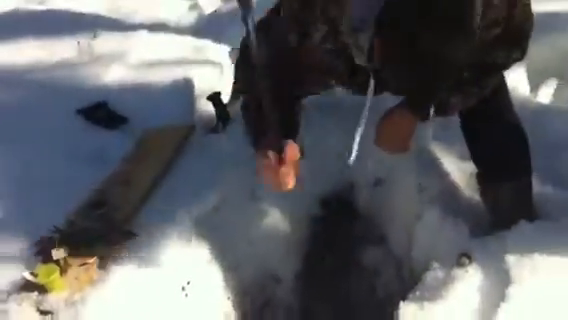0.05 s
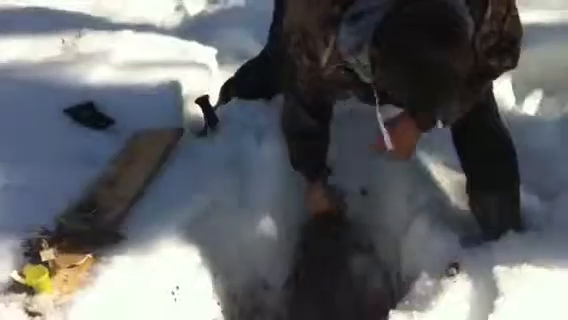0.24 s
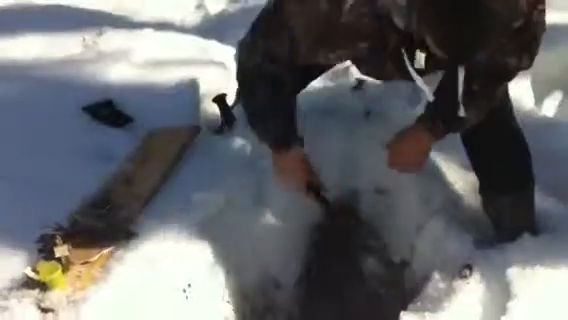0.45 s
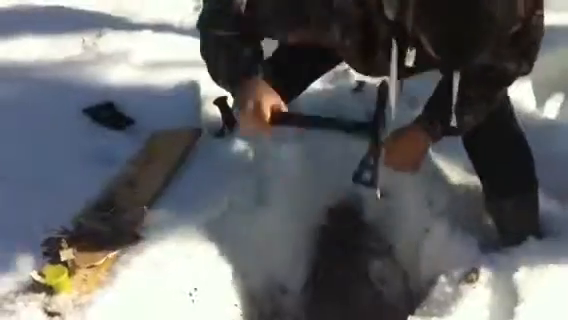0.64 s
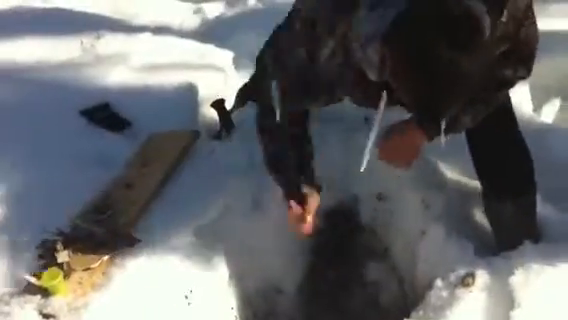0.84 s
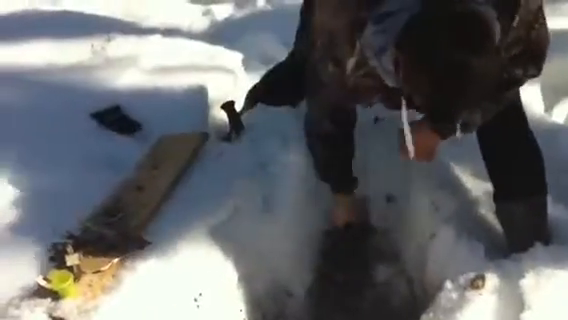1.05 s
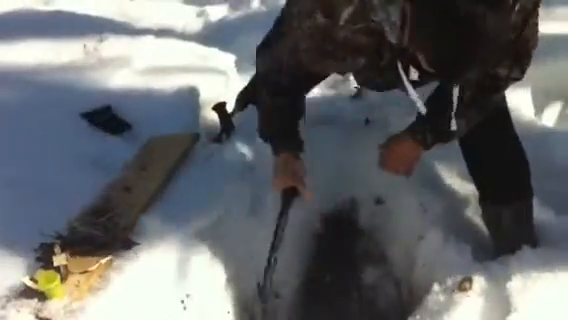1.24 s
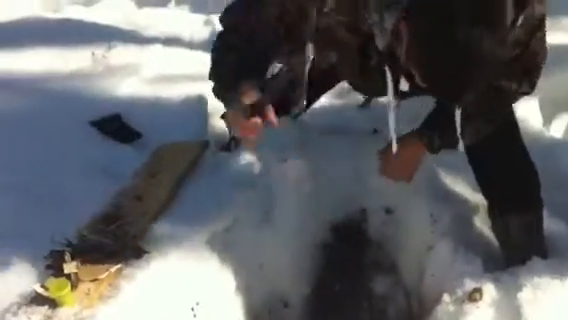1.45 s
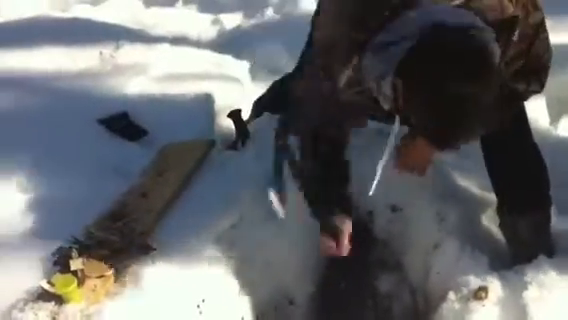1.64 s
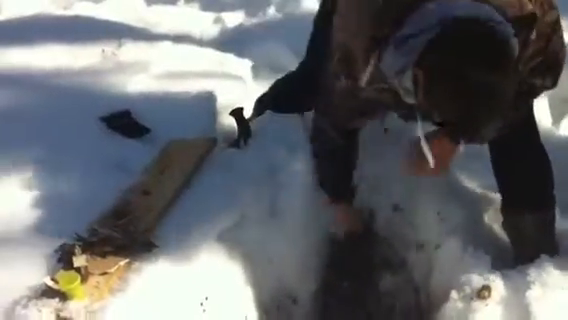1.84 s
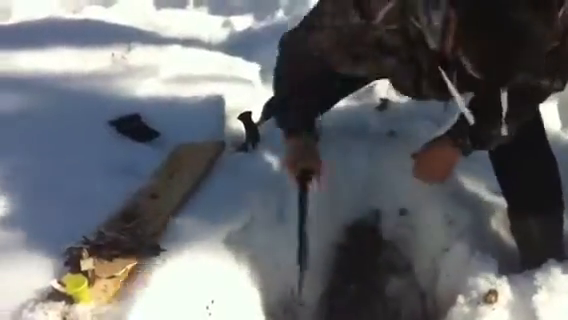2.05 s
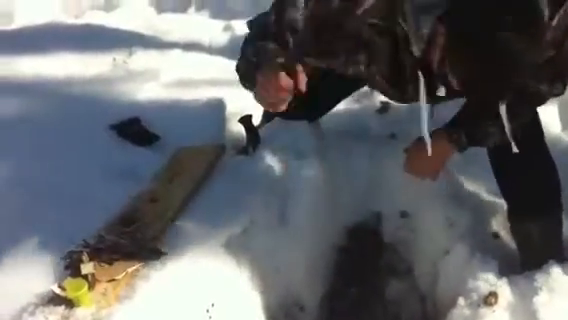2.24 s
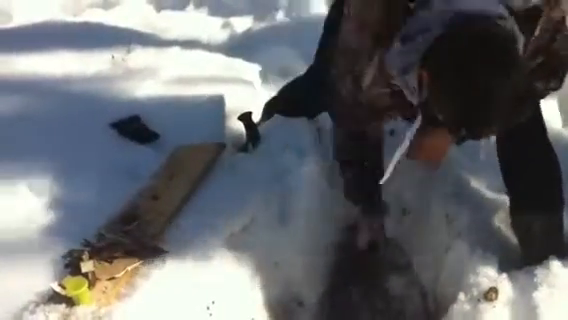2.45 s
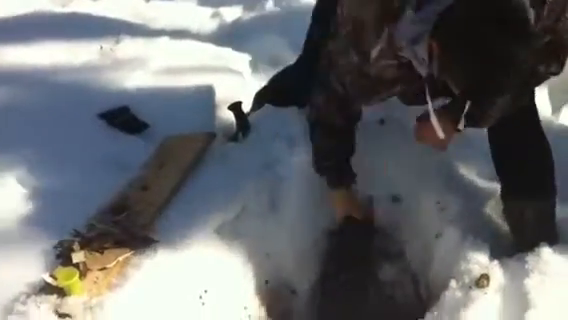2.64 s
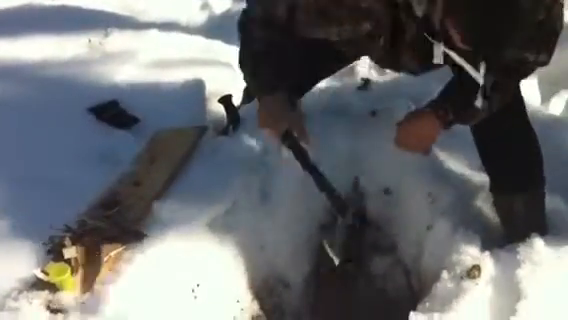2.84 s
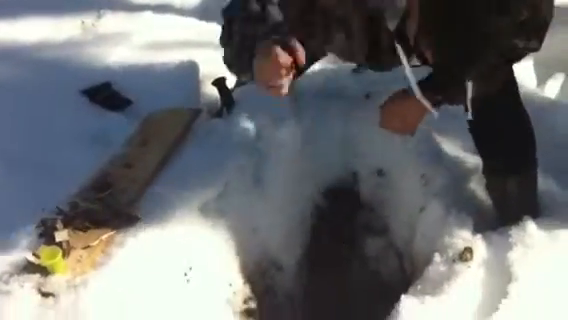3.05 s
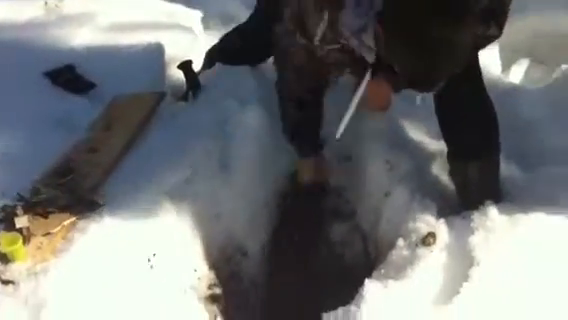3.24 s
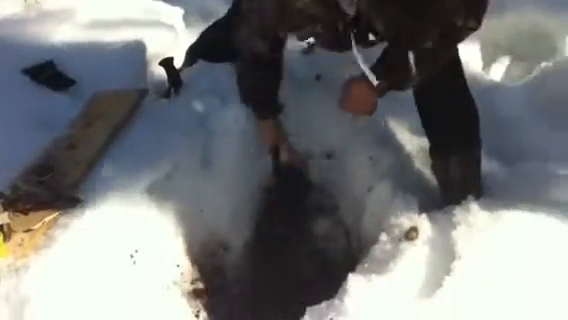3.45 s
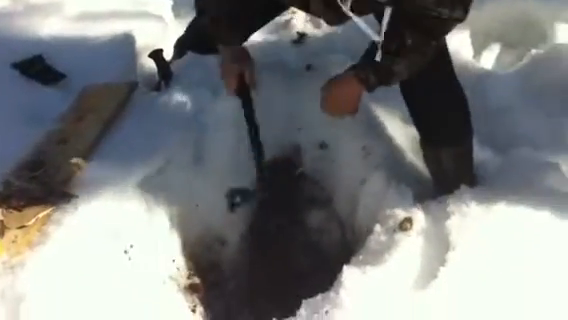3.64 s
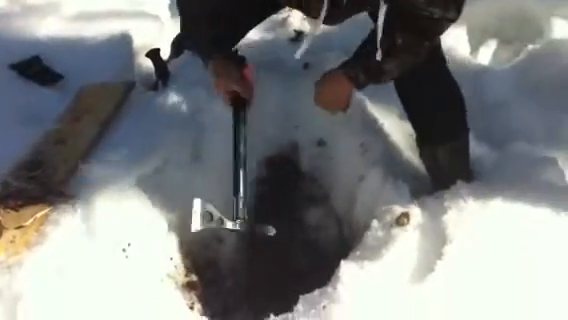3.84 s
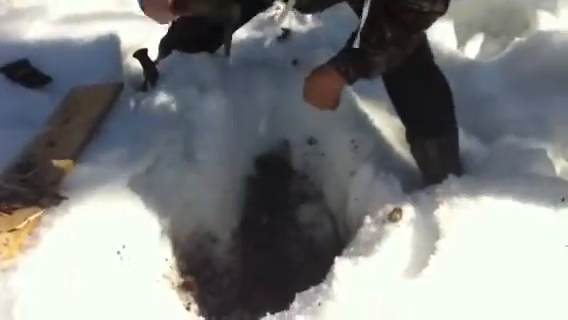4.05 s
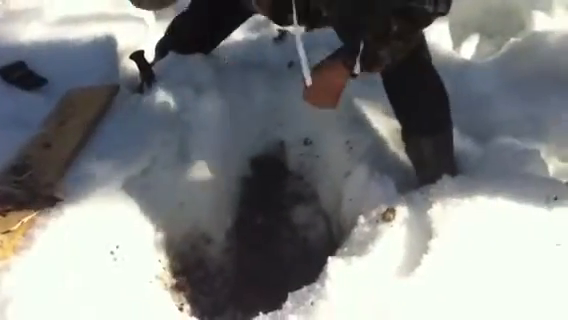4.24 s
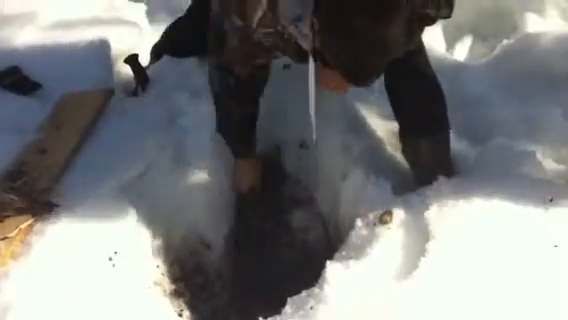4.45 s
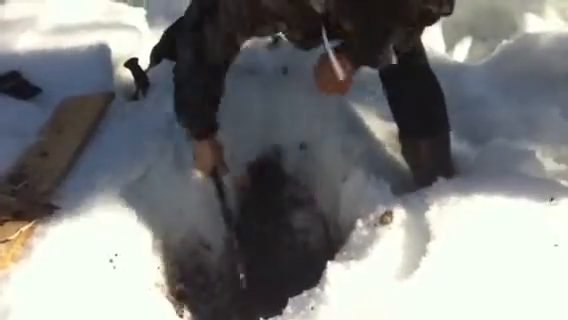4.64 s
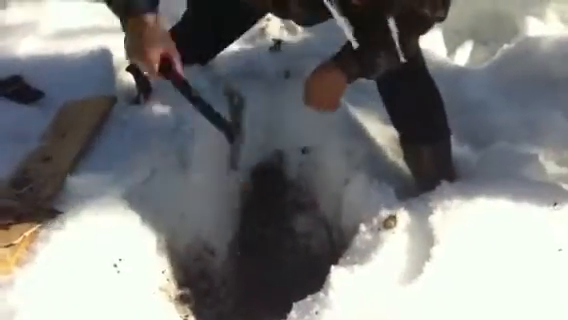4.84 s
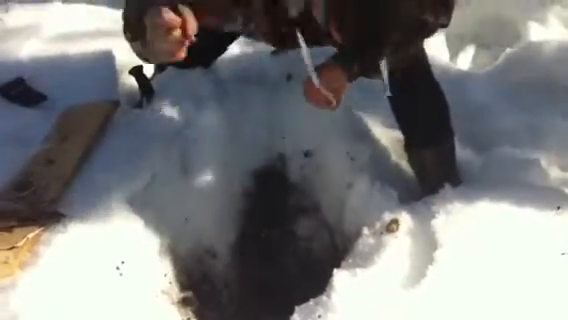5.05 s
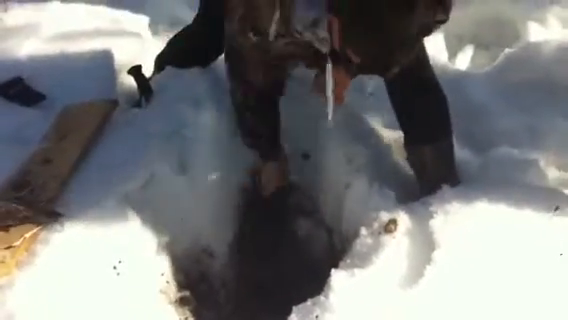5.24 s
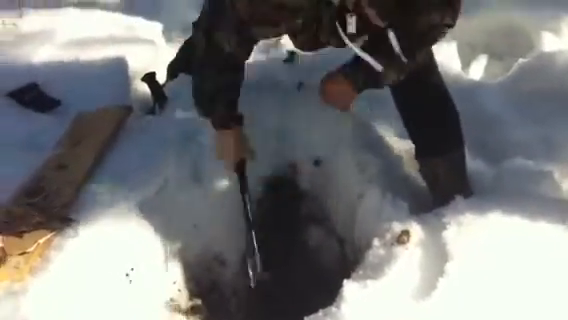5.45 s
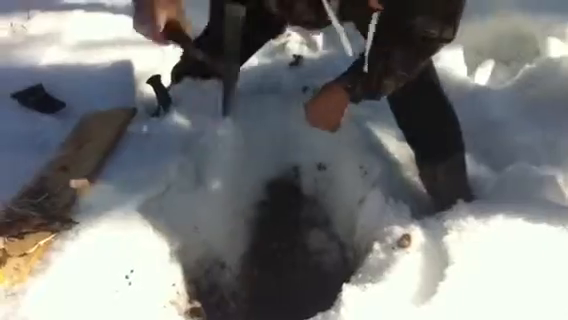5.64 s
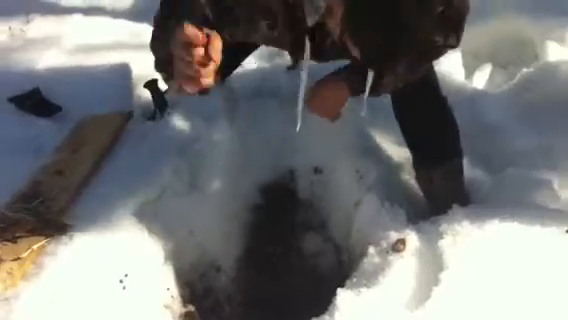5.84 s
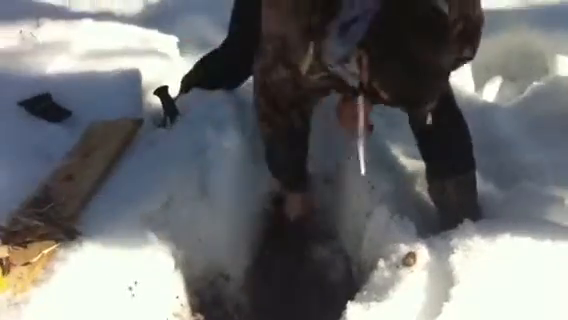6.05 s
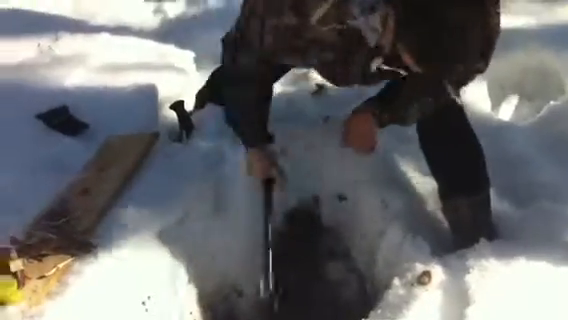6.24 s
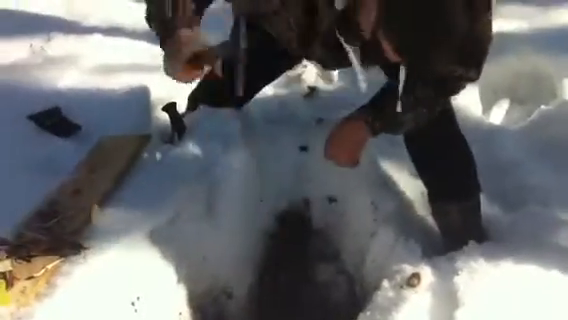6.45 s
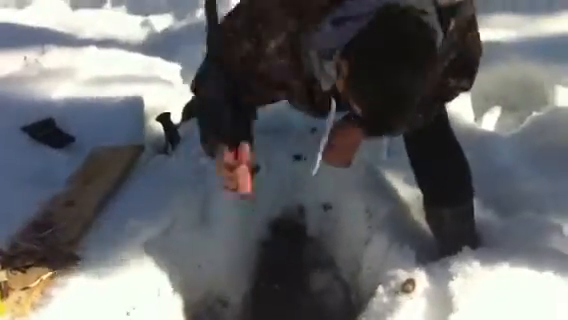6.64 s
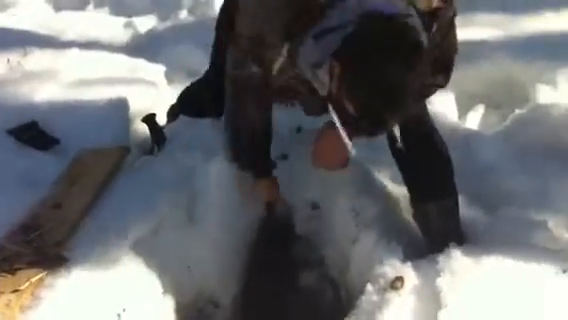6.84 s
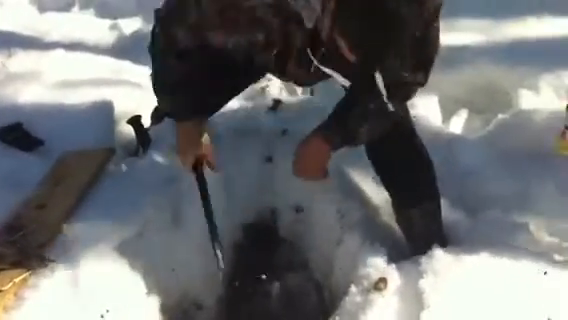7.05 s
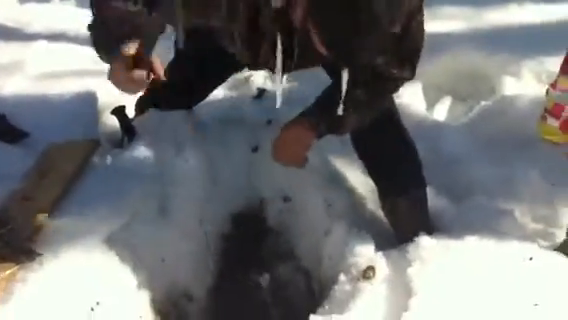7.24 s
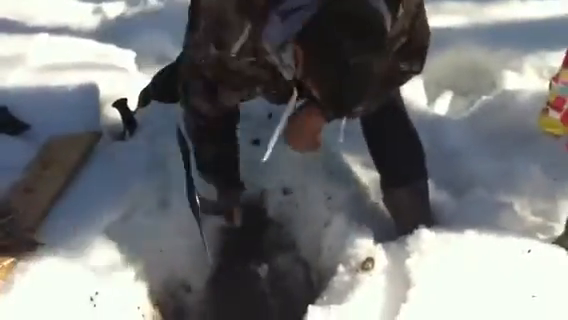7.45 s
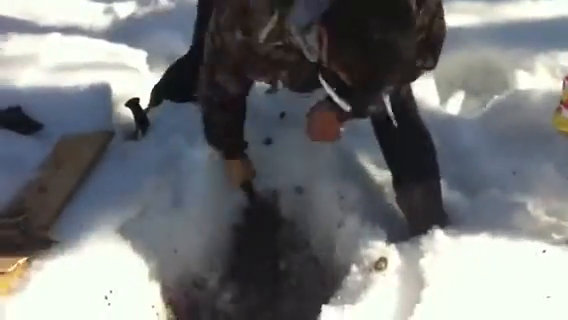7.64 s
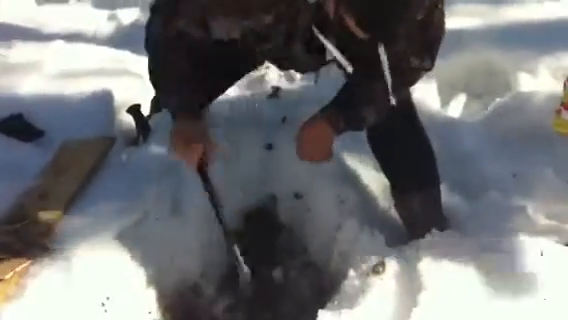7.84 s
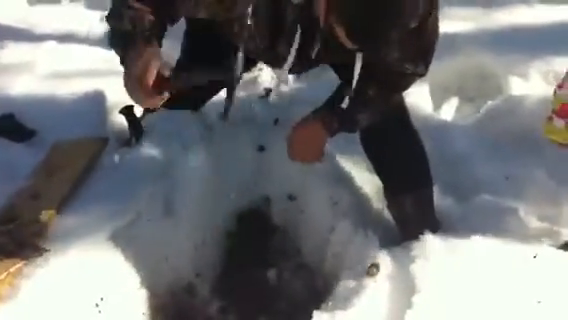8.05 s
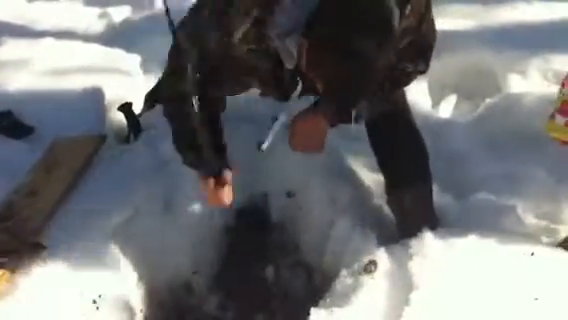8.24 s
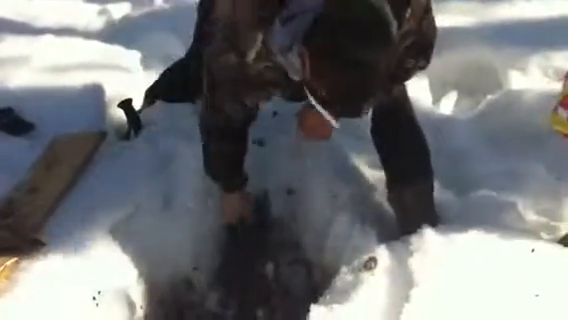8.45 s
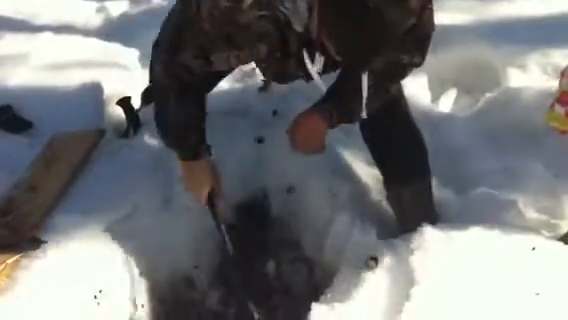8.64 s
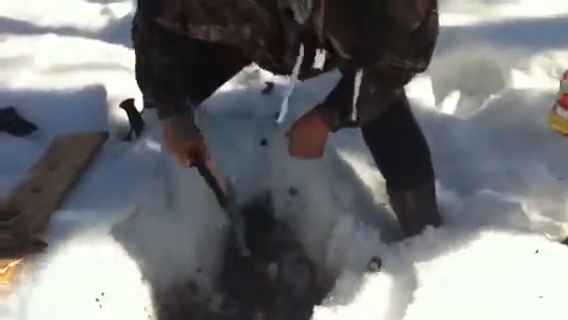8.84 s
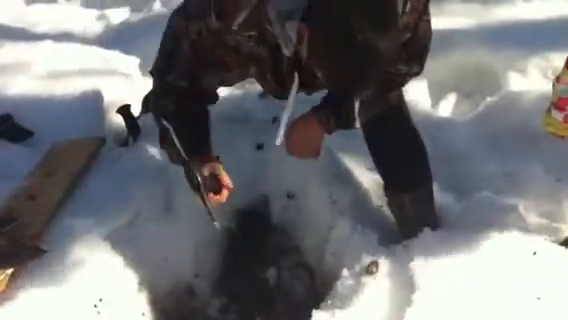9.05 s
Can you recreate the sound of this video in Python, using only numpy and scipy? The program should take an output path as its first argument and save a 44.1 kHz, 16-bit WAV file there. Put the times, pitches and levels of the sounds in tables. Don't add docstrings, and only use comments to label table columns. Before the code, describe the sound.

Quiet open winter air with a soft, slightly swelling breeze. A hatchet chops frozen ground at the bottom of a snow pit, with blows at about 0.3, 1.1, 1.9, 2.7, 3.4, 4.6, 5.4, 6.2, 6.9, 7.7 and 8.5 seconds. Each is a very short crunch and hard crack with a dull knock, a clipped steely ring and a small low thump; the first is strong, those at 6.9 and 7.7 bright and metallic, those around 4.6 to 6.2 duller. A soft spray of crumbs fades within a quarter second after most blows. Clods knock and tick down between, clearly near 2.4, 3.1, 3.5 and 7.7. Sleeve rustles and faint scuffs accompany the swings. Distant small birds chip thin, high notes throughout, clustered near 2.1 to 2.6 and 6.5 to 6.9, with a few hoarse buzzes. The space is dry, without deep bass.

```python
import sys
import numpy as np
from scipy import signal
from scipy.io import wavfile
from scipy.ndimage import uniform_filter1d

SR = 44100
rng = np.random.default_rng(int(sys.argv[2]) if len(sys.argv) > 2 else 0)


def to_wav(s):
    ch = np.atleast_2d(s).T
    pcm = np.round(np.clip(ch, -1, 1) * 32767)
    wavfile.write(sys.argv[1], SR, pcm.astype(np.int16))


def nominal_scale(level):
    x = np.asarray(level, float) / 20
    return 10 ** x


N = 401751

# start_s, bite_ms (cutting through crumbs),
# hard_ms (hard layer met this long after the start), ground_db, knock_db
BLOW_TIMES = [(0.3371, 5.5, -1, -6, -14), (1.1148, 0.53, -0.95, -12.5, -20), (1.89, 8.3, 5, -22.5, -14.5),
              (2.6543, 2.9, -0.5, -18, -15.5), (3.401, 2.3, -1.87, -26, -12), (4.6104, 1.96, 3, -19.5, -27),
              (5.3937, 5.7, 0, -18.5, -23), (6.163, 8.7, 6.5, -15, -19.5), (6.9314, 2.4, 0.3, -8.5, -18),
              (7.678, 2.3, -1.5, -18, -16.5), (8.5398, 1, -0.35, -11.5, -33)]
# ground_hz, thump_db, thump_hz, crumbs_db (rms), crumbs_hz
PIT_ANSWERS = [(1050, -15.5, 199, -47, 2800), (1037, -25, 168, -50.5, 2800), (1193, -17.5, 175, -52, 4750),
               (1021, -20, 172, -56, 7700), (1050, -14, 205, -51.5, 2720), (1020, -18.5, 169, -58.5, 2900),
               (1020, -17.5, 168, -78, 2830), (990, -17.5, 170, -52, 3060), (1150, -28, 170, -49.5, 4300),
               (950, -27, 220, -50.5, 3700), (1056, -29.5, 200, -55, 3060)]


def unit(x):
    return x / np.sqrt(np.mean(x ** 2) + 1e-20)


def peak_one(x):
    return x / (np.max(np.abs(x)) + 1e-20)


def resonate(x, hz, width_hz):
    r = np.exp(-np.pi * width_hz / SR)
    top = np.array([1, 0, -1]) * (1 - r * r) / 2
    return signal.lfilter(top, [1, -2 * r * np.cos(2 * np.pi * hz / SR), r * r], x)


def ring_twice(x, hz, width_hz):
    return peak_one(resonate(resonate(x, hz, width_hz), hz, width_hz))


def add(out, start_s, piece):
    at = max(round(start_s * SR), 0)
    out[at:at + len(piece)] += piece[:len(out) - at]


def drift(rate_hz):
    r = np.exp(-2 * np.pi * rate_hz * 40 / SR)
    noise = rng.standard_normal(N // 40 + 2002)
    slow = signal.lfilter([1], [1, -2 * r, r * r], noise)[2000:]
    return np.interp(np.arange(N) / 40, np.arange(len(slow)), unit(slow))


def grains(size, per_s, spread_db):
    chance, heft, sign = rng.random((3, size))
    clicks = chance < per_s / SR
    return unit(clicks * nominal_scale(-spread_db * np.log(heft + 0.03)) * np.sign(sign - 0.5))


def bands(source, spectrum, level_db, patchy_db):
    out, edges = 0, 32 * 2 ** np.arange(0, 9.1, 0.5)
    hz_points, db_points = np.transpose(spectrum)
    for k, (low, high) in enumerate(zip(edges, edges[1:])):
        band_filter = signal.butter(2, [low, high], "band", fs=SR, output="sos")
        band = signal.sosfilt(band_filter, source[k % 2])
        hz = np.sqrt(low * high)
        colour_db = np.interp(np.log(hz), np.log(hz_points), db_points)
        out = out + nominal_scale(colour_db + level_db(hz) + patchy_db * drift(13)) * band
    return out


def air():
    # pitch_hz, level_db (per Hz)
    hush = [(18, -32), (30, -1.5), (53, -23), (184, 0), (287, -0.5), (499, -4.5), (913, -4), (2830, -12.5),
            (3770, -15), (5170, -15), (10500, -18), (14800, -18), (16000, -21)]
    # time_s, level_db
    breeze = [(0.0, -67), (0.3, -64.5), (0.48, -68.5), (2.51, -68), (2.74, -66.5), (4.03, -66),
              (4.51, -63.5), (4.9, -67.5), (6.04, -63), (6.62, -65), (6.8, -66), (7.05, -68), (7.31, -68),
              (7.51, -66.5), (8.85, -73), (9.11, -69)]
    # pitch_hz, share (of the breeze's dB swing)
    follows = [(1100, 1.05), (3000, 0.74), (6500, .5)]
    # pitch_hz, lift_db
    sleeve = [(1100, 2.5), (3000, 4), (6500, 3)]
    rise_s, fall_s = 0.2, 0.17
    t = np.arange(N) / SR
    breeze_db = np.interp(t, *np.transpose(breeze))
    swing = sum(np.exp(np.minimum((t - s) / rise_s, (s - t) / fall_s)) for s, *_ in BLOW_TIMES)

    def level_db(hz):
        from_breeze = np.interp(hz, *np.transpose(follows)) * (breeze_db + 66.5)
        return from_breeze + np.interp(hz, *np.transpose(sleeve)) * swing

    white = rng.standard_normal((2, N))
    return nominal_scale(-63.5) * unit(bands(white, hush, level_db, patchy_db=1.4))


def whistle(shape, ratio):
    s, hz, db = np.transpose(shape)
    t = np.arange(s[0], s[-1], 1 / SR)
    direct, scattered = [unit(uniform_filter1d(rng.standard_normal(N // 50), size=90))[:len(t)]
                         for _ in range(2)]
    phase = 2 * np.pi * np.cumsum(ratio * np.interp(t, s, hz)) / SR
    wave = (1 + 0.45 * direct) * np.sin(phase) + 0.45 * scattered * np.cos(phase)
    return nominal_scale(np.interp(t, s, db)) * wave


def birds():
    # start_s, peak_db
    hook_notes = [(0.114, -47), (0.2803, -46), (0.857, -48.5), (2.0971, -45), (2.257, -44), (2.413, -43),
                  (2.598, -43), (3.3563, -45), (3.96, -46), (4.7471, -46), (4.8685, -48), (5.502, -48),
                  (5.627, -45), (6.4856, -44), (6.6426, -46), (6.788, -44.5), (8.083, -49.5), (8.412, -54)]
    # start_s, peak_db
    arch_notes = [(0.714, -55), (0.957, -49.5), (1.2161, -51.5), (1.3418, -51), (1.4605, -49.5),
                  (3.493, -44.5), (7.8254, -55.5), (8.2302, -58.5)]
    # start_s, peak_db, pitch_hz
    pip_notes = [(1.8063, -56, 4820), (3.6244, -50, 5150), (4.065, -53.5, 5210), (4.424, -58.5, 5260),
                 (4.9756, -64.5, 4540), (5.7335, -49.5, 5170), (5.8562, -52, 5160), (8.3923, -61, 6120),
                 (8.712, -69, 6200), (8.74, -71, 4800), (4.44, -61.5, 7000), (1.13, -54, 8150),
                 (1.148, -52.5, 8370), (1.192, -49.5, 8300)]
    # start_s, peak_db, upper_db (upper band), length_s
    rasps = [
        (0.51, -60.5, -1, 0.061),
        (1.59, -56.5, -2, 0.047),
        (1.917, -50, -9, 0.021),
        (3.01, -55.5, -7, 0.049),
        (5.071, -53.5, -4.5, 0.056),
        (7.514, -58, -1.5, 0.054),
    ]
    # time_s (from the start), pitch_hz, level_db
    hook = [(-.024, 5647, -23.5), (-.014, 6100, -9), (-.003, 5923, -10), (.003, 5186, 1.5),
            (.007, 4846, -6.5), (.011, 4600, -26.5)]
    arch = [(-.004, 4790, -10), (.003, 5400, 0), (.01, 5210, -12), (0.016, 5120, 2), (0.026, 4650, -12),
            (.029, 4540, -29)]
    # time_s (from the start), pitch_ratio, level_db
    pip = [(-.006, 1.0, -22), (.002, 1.005, -1), (.011, .995, -3), (.019, .99, -20), (.03, .99, -36)]
    out = np.zeros(N)
    for s, db in hook_notes + [(6.914, -44)]:
        note = whistle(hook, 1 + 0.016 * rng.standard_normal())
        add(out, s + hook[0][0], nominal_scale(db - 12.0) * note)
    for s, db in arch_notes:
        note = whistle(arch, 1 + 0.0095 * rng.standard_normal())
        add(out, s + arch[0][0], nominal_scale(db - 7.5) * note)
    for s, db, hz in pip_notes:
        add(out, s + pip[0][0], nominal_scale(db - 4.0) * whistle(pip, hz))
    t = np.arange(0, 0.1, 1 / SR)
    for s, db, upper_db, length_s in rasps:
        buzz = np.sin(np.pi * np.clip(t / length_s, 0, 1)) * rng.standard_normal(len(t))
        low = ring_twice(buzz, 2880, 500)
        high = ring_twice(buzz, 5270, 900)
        add(out, s - 0.005, nominal_scale(db + 4.6) * (low + nominal_scale(upper_db) * high))
    trees = rng.standard_normal(len(t)) * nominal_scale(-60 * t / 0.17)
    echoes = signal.fftconvolve(out, trees / np.linalg.norm(trees))[:N]
    return out + nominal_scale(-11.5) * echoes


def scuffs():
    # start_s, level_db (rms), length_s, crunch_hz, hiss_db (next to the crunch)
    rubs = [(.0, -66, 0.056, 810, -9), (0.246, -61.5, 0.18, 700, -11), (0.416, -64.5, 0.083, 2600, 1),
            (0.935, -74.5, 0.21, 980, 5.5), (1.108, -36.5, .008, 4970, -8), (1.122, -49, 0.033, 2680, -21),
            (1.186, -56.5, 0.016, 2300, -13), (1.562, -69, 0.05, 1500, 3),
            (2.365, -58, 0.0085, 11540, -25.5), (2.484, -60, 0.016, 13000, -9),
            (2.797, -61.5, 0.14, 372, -15), (3.673, -56, 0.073, 364, -11), (3.677, -60, 0.087, 990, -25),
            (4.471, -63.5, 0.12, 6000, -3), (4.655, -62, 0.059, 915, 0.5), (4.807, -53.5, 0.022, 1590, -9),
            (5.475, -62.5, 0.046, 3730, -11), (5.949, -67, 0.36, 2500, -12),
            (6.803, -70.5, .1, 1500, -13.5), (7.498, -68, 0.11, 1500, -9), (8.011, -63, 0.17, 1020, -7.5),
            (8.636, -62.5, 0.025, 3730, -15.5), (9.03, -74.5, 0.11, 8800, -8)]
    hiss_hz = 10034
    out, t = np.zeros(N), np.arange(0, 0.25, 1 / SR)
    for s, db, length_s, hz, hiss_db in rubs:
        rub = grains(len(t), 9000, 3.0)
        crunch = unit(resonate(rub, hz, 0.75 * hz))
        hiss = unit(resonate(resonate(rub, hiss_hz, 8000), hiss_hz, 8000))
        swell = np.sin(np.pi * np.clip(t / length_s, 0, 1)) ** 0.23
        add(out, s, nominal_scale(db) * swell * (crunch + nominal_scale(hiss_db) * hiss))
    return out


def clods():
    # start_s, peak_db, ring_hz, knock_db, bright_db (both next to the ring)
    lumps = [(0.028, -40, 870, -21, -28), (0.376, -33.5, 1167, -5.5, 1), (0.944, -39, 6760, -37.5, 7),
             (1.193, -43.5, 8200, -11.5, -8), (1.574, -34.5, 1460, -9.5, 3),
             (2.375, -23.5, 2000, -14.5, 0.5), (3.0672, -26, 1806, -12, 1), (3.5161, -28, 1222, -6, 2.5),
             (3.899, -29.5, 1640, -9.5, -0.5), (4.22, -36, 3020, -6.5, -24),
             (4.231, -42, 3250, -20.5, -18.5), (4.685, -46, 2000, -6, -15), (4.811, -39.5, 860, -3.5, -15),
             (5.546, -29.5, 2460, -4.5, -1.5), (7.6926, -23.5, 3276, -6, 6), (8.473, -35.5, 297, -20, -45)]
    # start_s, peak_db, ring_hz
    chips = [(2.319, -54, 7000), (2.519, -48.5, 12000), (2.94, -49, 7960), (4.172, -56, 5500),
             (4.198, -53.5, 10500), (5.301, -49.5, 3040), (6.569, -55, 6000), (7.36, -58.5, 3930),
             (7.503, -49.5, 3120), (8.119, -47, 1280), (8.918, -52, 1421), (8.927, -45, 2170),
             (8.961, -52, 1190)]
    chip_knock_db, chip_bright_db = -16, -29
    spatter_s, spatter_cycles = 0.017, 15.0
    out, t = np.zeros(N), np.arange(-0.008, 0.04, 1 / SR)
    contact = np.arange(len(t)) == np.argmax(t >= 0)
    lead_in = nominal_scale(-24.5 + 1300 * np.minimum(t, 0))
    for s, db, hz, knock_db, bright_db in lumps + [(*chip, chip_knock_db, chip_bright_db) for chip in chips]:
        fade_s = spatter_s + spatter_cycles / hz
        spatter = np.where(t < 0, lead_in, nominal_scale(-60 * t / fade_s)) * grains(len(t), 15000, 2.2)
        force = spatter + 7.7 * contact
        tick = ring_twice(force, hz, 500 + 0.3 * hz)
        tick += nominal_scale(knock_db) * ring_twice(force, 450, 400)
        tick += nominal_scale(bright_db) * ring_twice(force, 7600, 5600)
        add(out, s + t[0], nominal_scale(db - 1.4) * peak_one(tick))
    return out


def debris():
    # pitch_hz, level_db (per Hz)
    colour = [(120, -34.5), (200, -1.5), (659, -8), (777, -12), (851, -7.5), (1770, -12.5), (3830, -8.5),
              (13800, -25), (16000, -23)]
    lag_s, fade_s, broad_db = 0.015, 0.27, 0
    out, t = np.zeros(N), np.arange(0, 0.3, 1 / SR)
    patter = [grains(N, 6000, 3.0), grains(N, 6000, 3.0)]
    broad = unit(bands(patter, colour, lambda hz: 0, patchy_db=-2.5))
    lumpy = nominal_scale(2.8 * drift(70))
    fall = (1 - np.exp(-t / 0.011)) * nominal_scale(-60 * t / fade_s)
    for (s, bite_ms, *_), (*_, db, hz) in zip(BLOW_TIMES, PIT_ANSWERS):
        s += bite_ms / 1e3 + lag_s
        here = slice(round(s * SR), round(s * SR) + len(t))
        pitched = unit(resonate(patter[0][here], hz, 0.4 * hz))
        spray = pitched + nominal_scale(broad_db) * broad[here]
        add(out, s, nominal_scale(db) * fall * lumpy[here] * spray)
    return out


def fractures(t, hold_s, fade_s, entry_db):
    entry = nominal_scale(entry_db + 1900 * np.minimum(t, 0)) * (t < 0)
    burst = nominal_scale(-60 * np.maximum(t - hold_s, 0) / max(fade_s, 0.003)) * (t >= 0)
    snap = 2.5 * (np.arange(len(t)) == np.argmax(t >= 0))
    return (entry + burst) * grains(len(t), 12000, 3.0) + snap + 1e-18


def blows():
    # ring_db, ring_hz, edge_db, edge_hz, sparkle_db
    steel = [(-6.5, 2190, -8.5, 6360, -16), (-16, 2000, -10.5, 5900, -20.5),
             (-15.5, 2600, -13.5, 7870, -17.5), (-19.5, 2640, -23.5, 7000, -30),
             (-8.5, 2500, -15, 4620, -23), (-19.5, 2900, -28, 5140, -32.5), (-28.5, 2230, -35, 8340, -32),
             (-20.5, 3060, -32, 9350, -28.5), (-7, 3740, -12, 6410, -17.5), (-9, 3330, -15, 8600, -9.5),
             (-10.5, 2700, -17.5, 5600, -13.5)]
    thump_lag_s = 0.0036
    snap_db = -9
    out, t = np.zeros(N), np.arange(-0.005, 0.04, 1 / SR)
    push = np.exp(-0.5 * ((t - 0.001) / 0.0004) ** 2) + 1e-18
    pit_cut = signal.butter(2, 120, "high", fs=SR)
    for blow, metal, pit in zip(BLOW_TIMES, steel, PIT_ANSWERS):
        s, bite_ms, hard_ms, ground_db, knock_db = blow
        ring_db, ring_hz, edge_db, edge_hz, sparkle_db = metal
        ground_hz, thump_db, thump_hz, *_ = pit
        bite_s, hard_s = max(bite_ms, 0) / 1e3, s + hard_ms / 1e3

        force = fractures(t, bite_s, 0.014, -19.5)
        add(out, s + t[0], nominal_scale(ring_db) * ring_twice(force, ring_hz, 1200))

        force = fractures(t, 0.0012 + 0.2 * bite_s, 0.015, -19)
        add(out, s + t[0], nominal_scale(edge_db) * ring_twice(force, edge_hz, 1800))
        add(out, s + t[0], nominal_scale(sparkle_db) * ring_twice(force, 13000, 6500))

        force = fractures(t, 0.0012, 0.012, -22.5)
        add(out, hard_s + t[0], nominal_scale(ground_db) * ring_twice(force, ground_hz, 800))
        add(out, hard_s + t[0], nominal_scale(knock_db) * ring_twice(force, 700, 610))

        thump = resonate(resonate(push, thump_hz, 110), thump_hz, 480)
        thump = peak_one(signal.lfilter(*pit_cut, thump))
        add(out, hard_s + thump_lag_s + t[0], -nominal_scale(thump_db) * thump)

        force = fractures(t, 0.0003, 0.005, -30)
        add(out, hard_s + t[0], nominal_scale(ground_db + snap_db) * ring_twice(force, 3000, 4600))
    return out


def scene():
    return (air() + birds() + scuffs() + clods() + debris() + blows())[None]


def duck(x):
    above_db, share, release_db_per_s, attack_s = -22.5, 0.094, 40, 0.089
    slope = release_db_per_s * np.arange(N) / SR
    level_db = 20 * np.log10(np.abs(x) + 1e-9)
    held_db = np.maximum.accumulate(level_db + slope, axis=-1) - slope
    r = np.exp(-1 / (attack_s * SR))
    excess_db = signal.lfilter([1 - r], [1, -r], np.maximum(held_db - above_db, 0))
    return x * nominal_scale(-share * excess_db)


def starve(x, depth_db):
    stretch, first_start = 1024, 314
    out = x.copy()
    number = (np.arange(N) - first_start) // stretch + 1
    starts = np.flatnonzero(np.diff(number, prepend=-1))
    for low, high in [(1500, 4500), (4500, 8000), (8000, 17000)]:
        band_filter = signal.butter(3, [low, high], "band", fs=SR, output="sos")
        band = signal.sosfiltfilt(band_filter, x)
        level = np.sqrt(uniform_filter1d(band ** 2, size=128) + 1e-14)
        loudest = np.maximum.reduceat(level, starts, axis=-1)[:, number]
        faint = uniform_filter1d(1.0 * (level < loudest * nominal_scale(-depth_db)), size=64)
        out -= faint * band
    return out


def roll_off(x):
    return signal.sosfilt(signal.butter(12, 17000, fs=SR, output="sos"), x)


def record(dry):
    no_bass = signal.sosfilt(signal.butter(2, 90, "high", fs=SR, output="sos"), dry)
    no_bass = no_bass - 0.33 * resonate(no_bass, 10600, 1300)
    rounded = np.tanh(duck(no_bass) / 0.93) * 0.93
    no_top = signal.sosfilt(signal.cheby2(10, 50, 16900, fs=SR, output="sos"), rounded)
    return roll_off(starve(no_top, depth_db=27))


dry = scene()
out = record(dry)
to_wav(out)
```